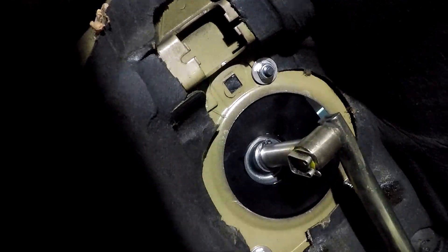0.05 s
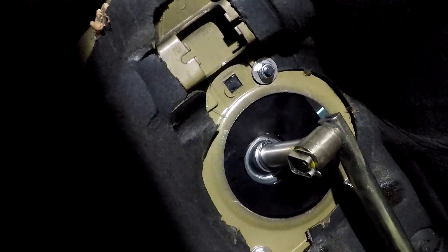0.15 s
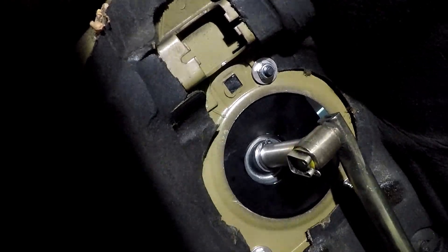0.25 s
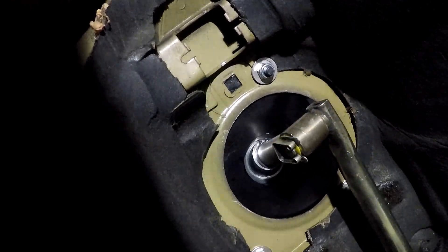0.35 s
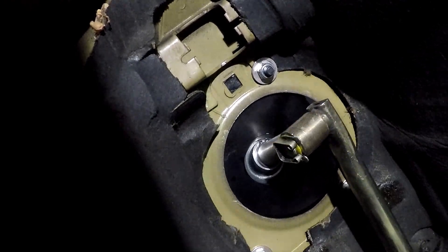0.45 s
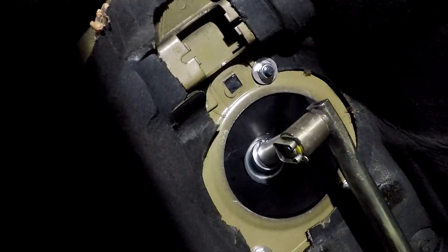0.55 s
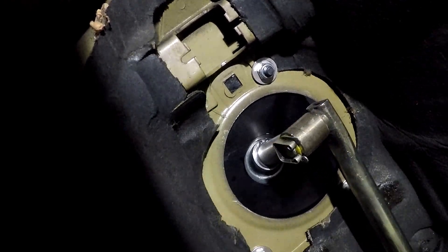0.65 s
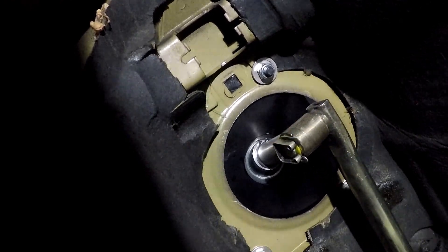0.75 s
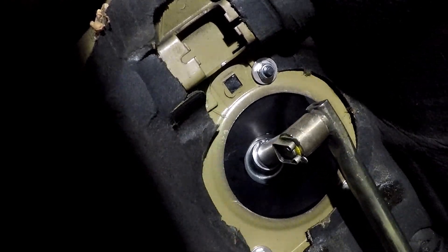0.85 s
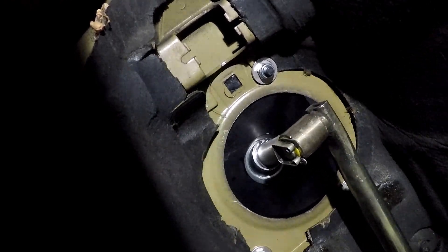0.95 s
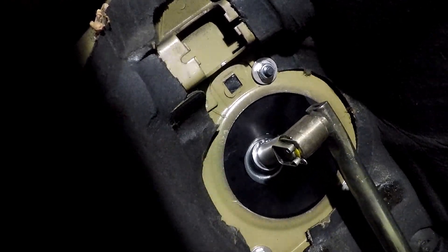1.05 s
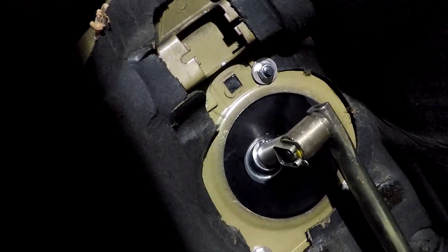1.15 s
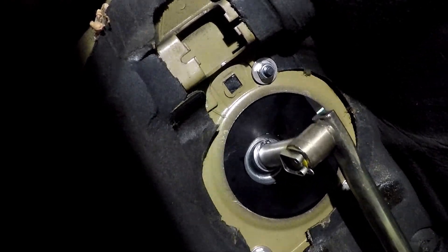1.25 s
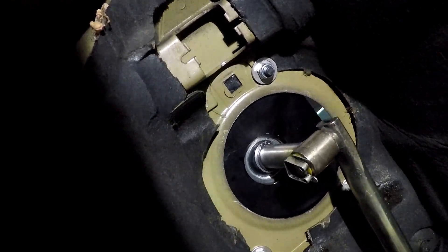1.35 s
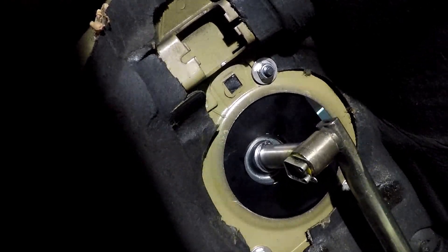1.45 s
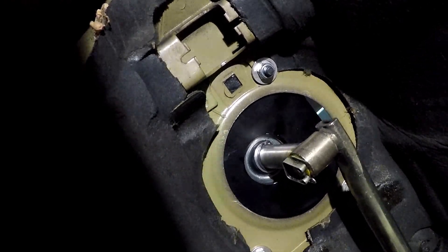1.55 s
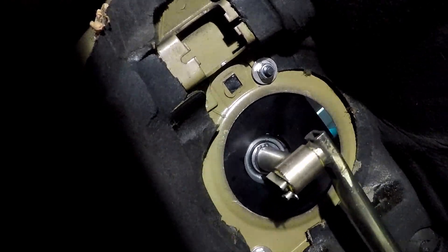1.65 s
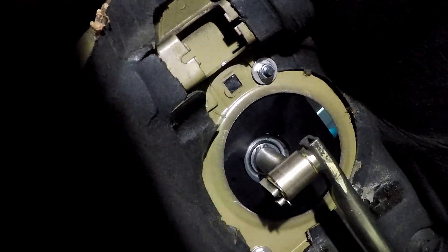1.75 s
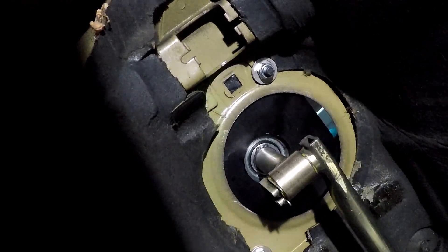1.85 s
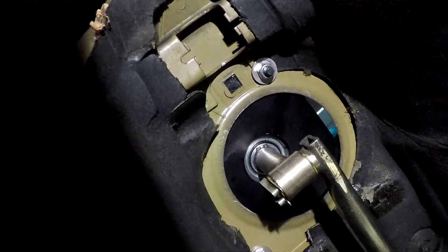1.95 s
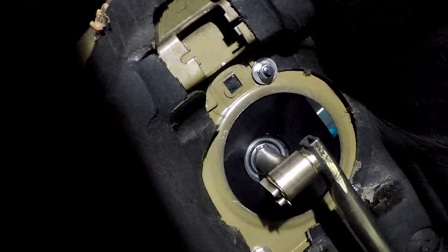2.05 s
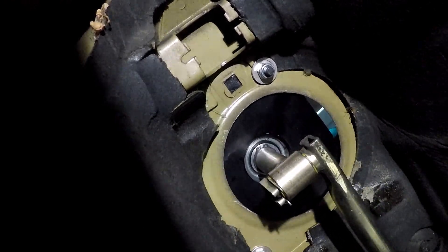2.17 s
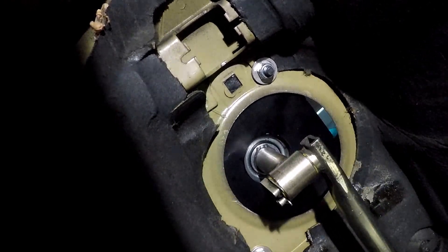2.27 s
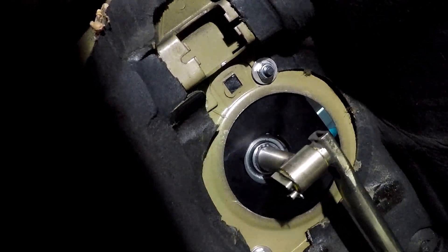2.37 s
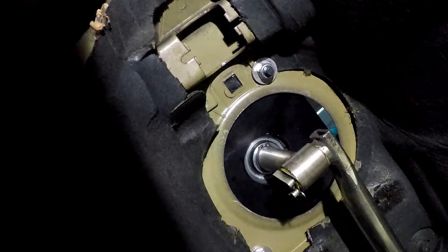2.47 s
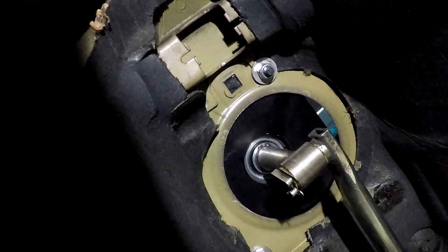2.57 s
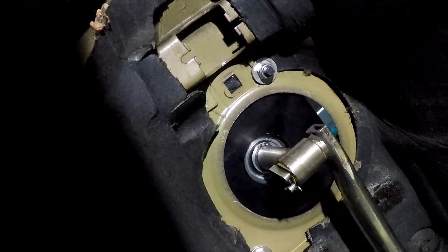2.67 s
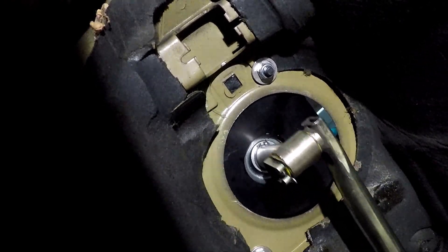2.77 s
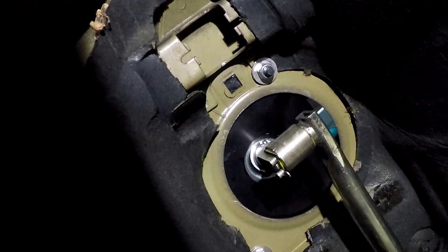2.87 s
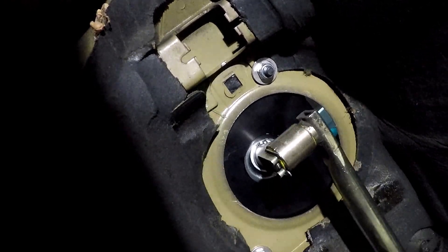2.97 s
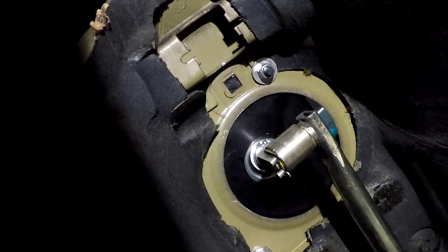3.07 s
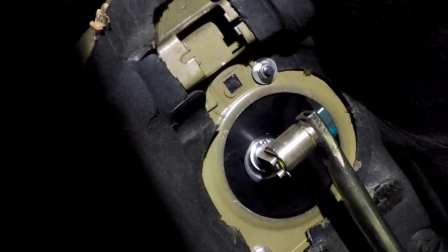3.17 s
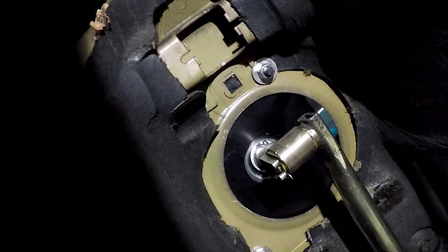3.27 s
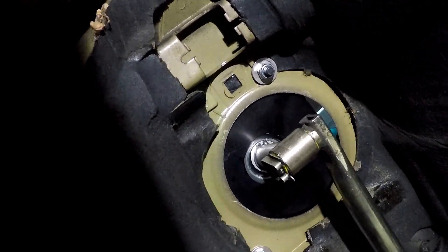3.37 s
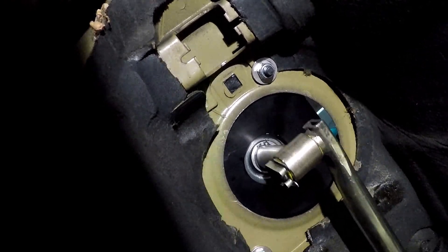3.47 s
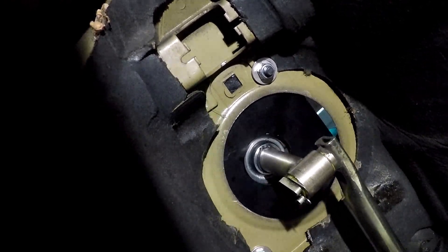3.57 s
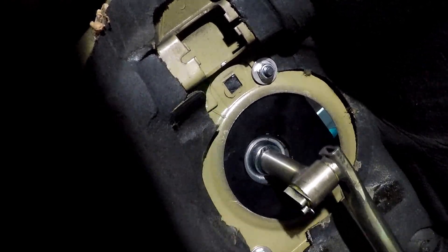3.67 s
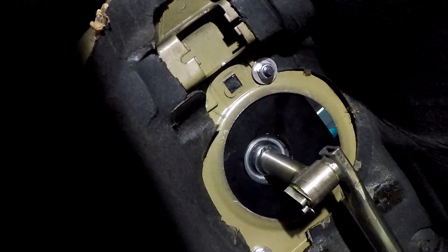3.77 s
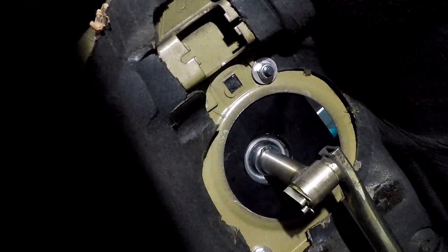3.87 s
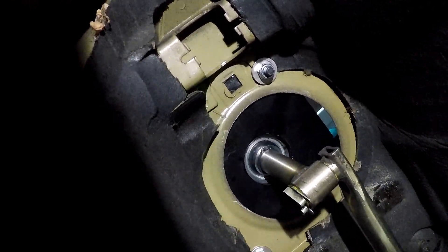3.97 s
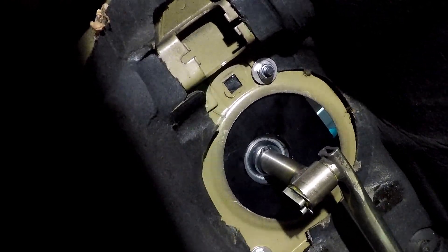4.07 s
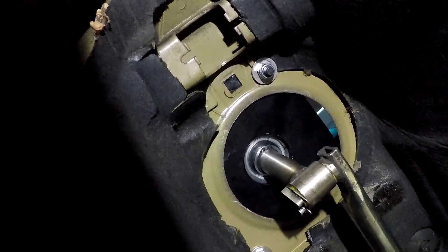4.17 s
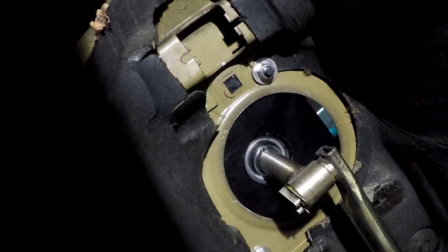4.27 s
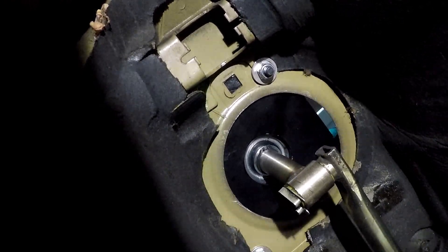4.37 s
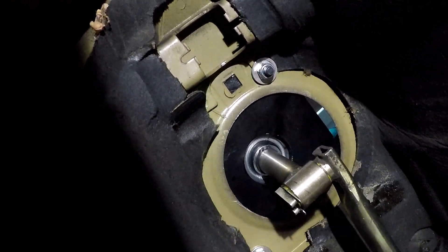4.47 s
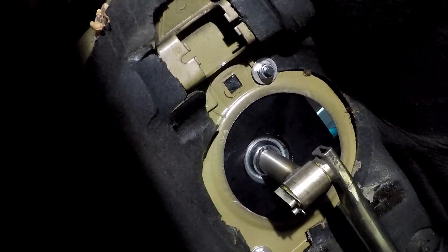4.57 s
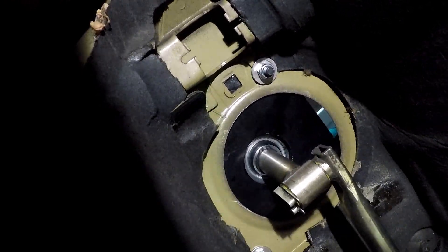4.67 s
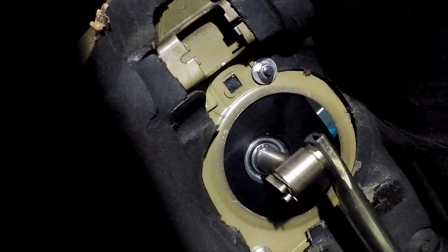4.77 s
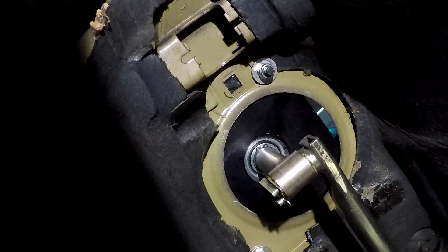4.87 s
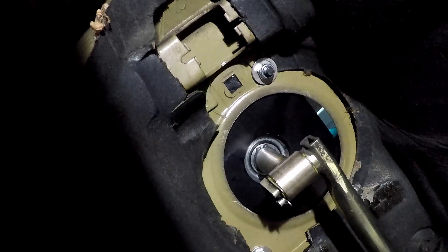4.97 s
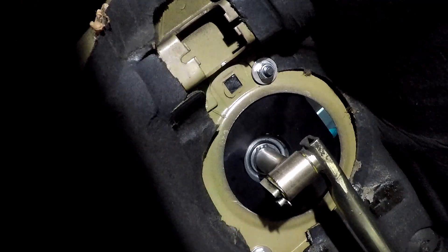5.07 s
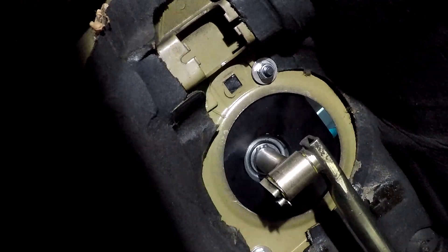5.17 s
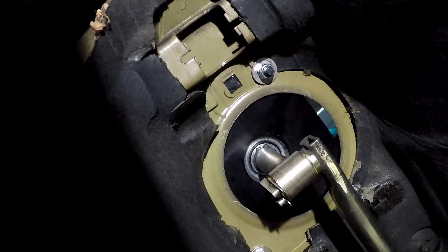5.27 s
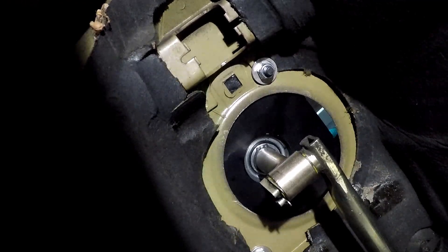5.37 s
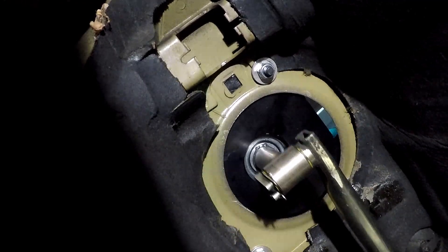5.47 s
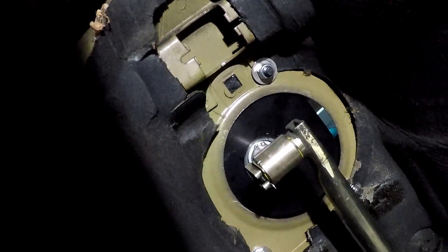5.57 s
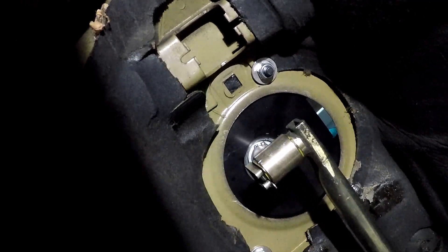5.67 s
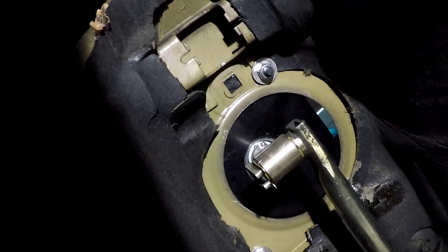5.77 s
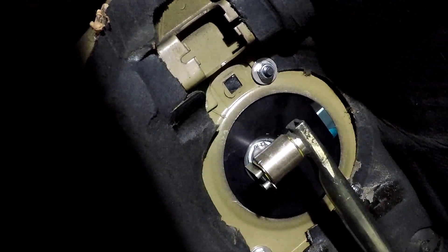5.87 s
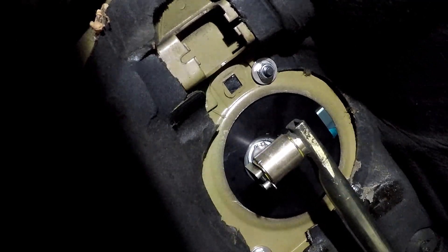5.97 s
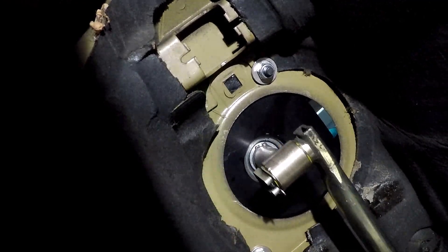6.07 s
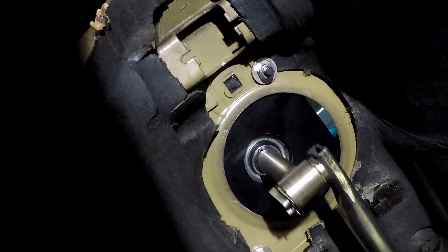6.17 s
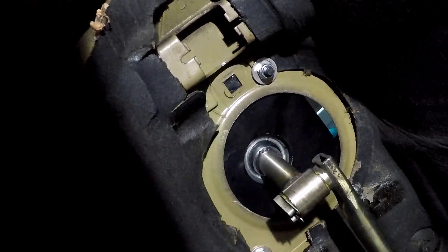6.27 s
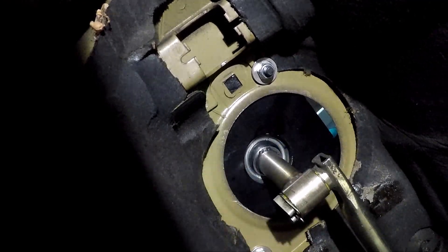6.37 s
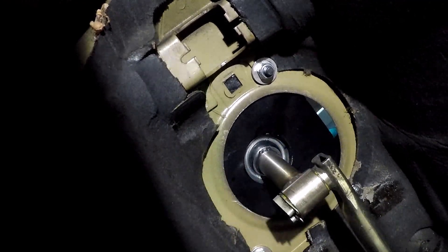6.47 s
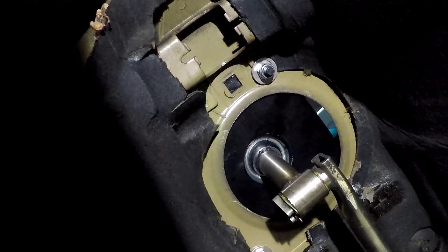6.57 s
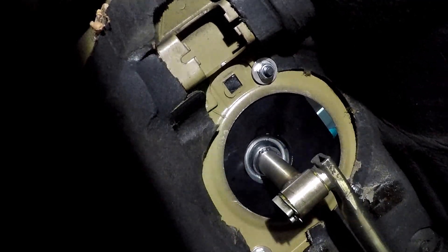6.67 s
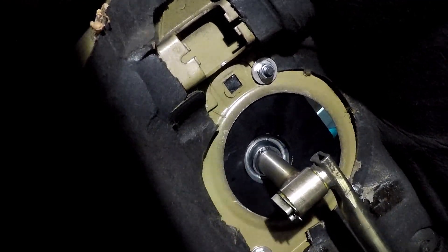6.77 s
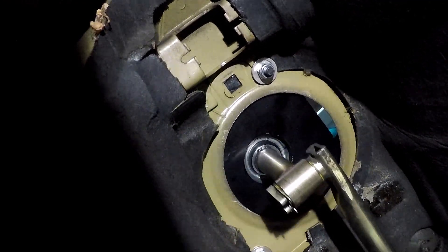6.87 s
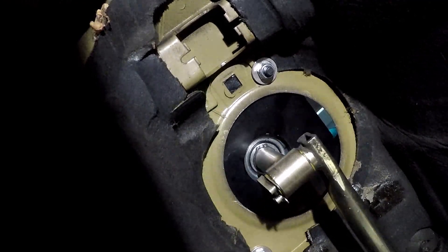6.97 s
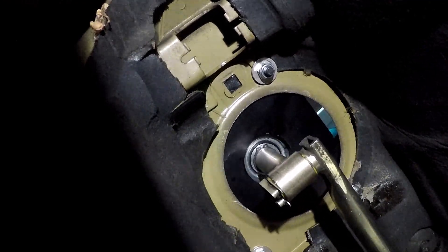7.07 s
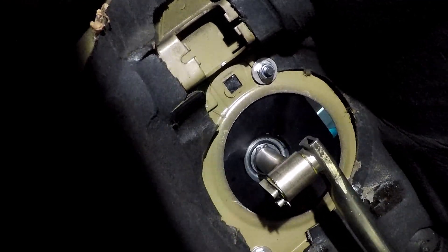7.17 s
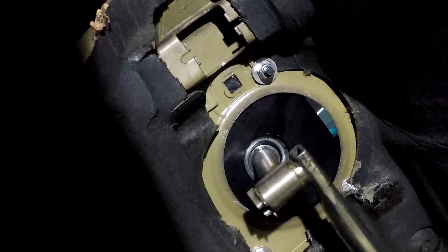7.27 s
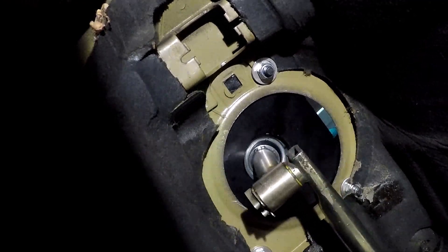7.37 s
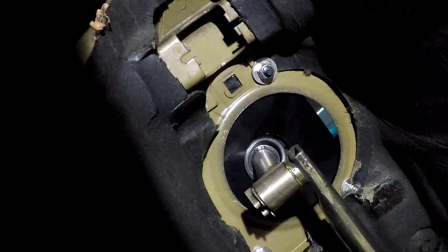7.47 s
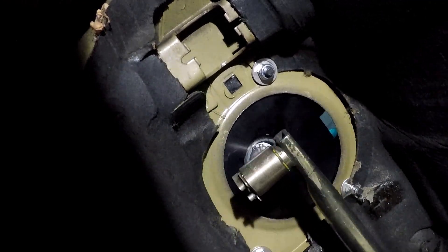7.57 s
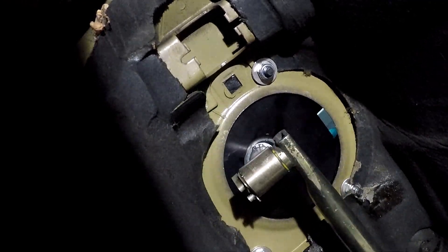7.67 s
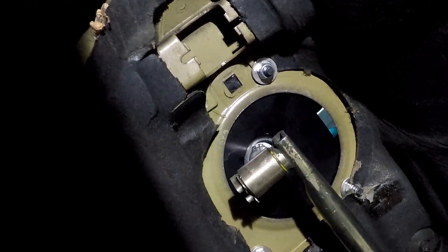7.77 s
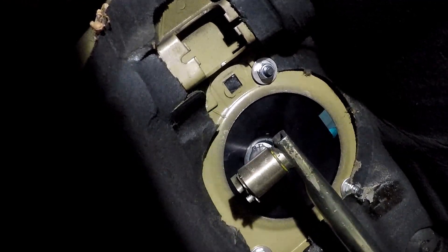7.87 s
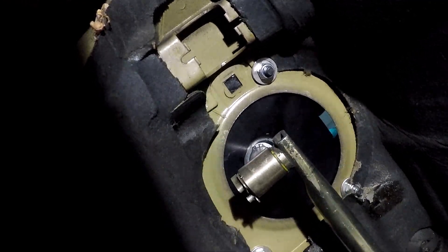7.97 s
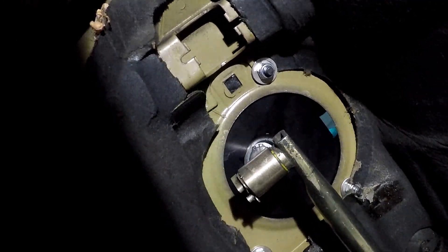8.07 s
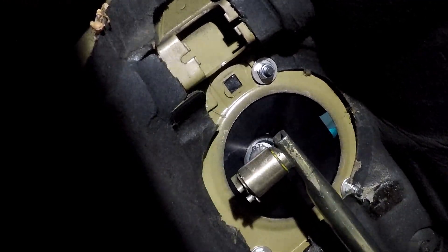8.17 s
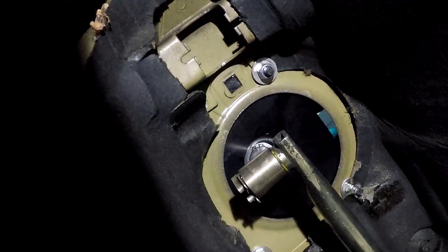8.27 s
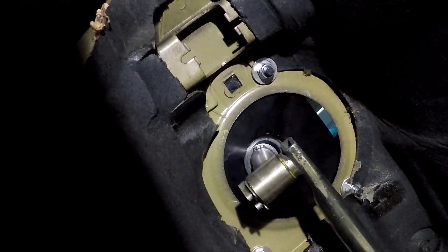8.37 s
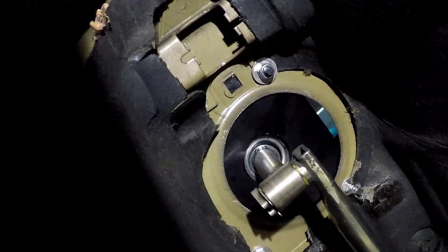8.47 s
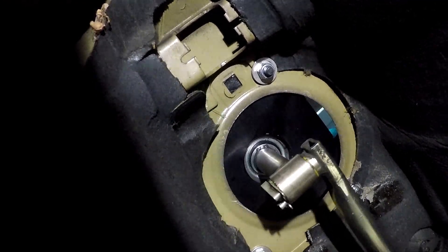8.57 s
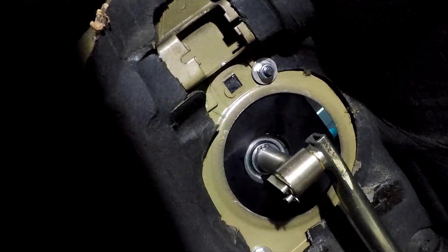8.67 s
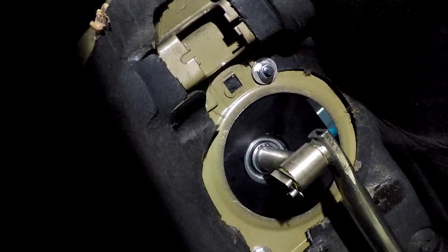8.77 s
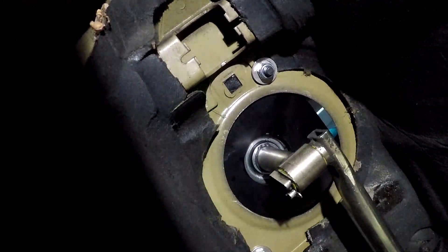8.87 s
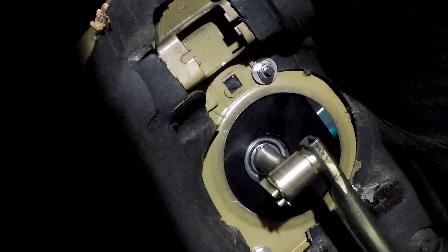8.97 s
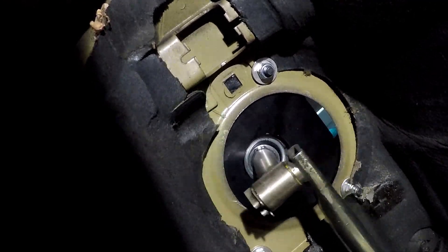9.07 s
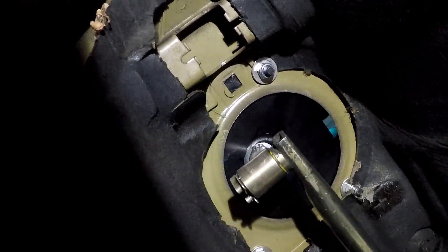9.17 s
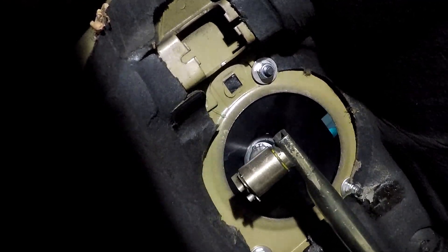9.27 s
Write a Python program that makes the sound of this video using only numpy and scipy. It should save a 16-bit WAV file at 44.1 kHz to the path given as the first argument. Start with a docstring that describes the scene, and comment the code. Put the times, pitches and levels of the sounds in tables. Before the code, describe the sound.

A gear shifter is worked through its gates: steel rod and joint clack, scrape and thud unevenly over faint hum and hiss.

```python
"""A gear lever is worked through the gates, heard close up under a car in a garage over low hum and hiss.
Each contact chatters: lever, rod, bracket, pan and joint, as mode banks plus damped noise, clank and boom.
From the first gates on the joint squeaks, some contacts tick in a narrow band of noise, gears going home
thump the gearbox on its mounts and the joint scrapes in tiny slips; later the rod rings on at end stops.
The gain control ducks on the hardest clunks and creeps back; two clunks, at the start and 2.8 s, spread wide."""
import sys
import numpy as np
from scipy import signal
from scipy.fft import rfft, irfft, next_fast_len
from scipy.io import wavfile
from scipy.ndimage import uniform_filter1d, minimum_filter1d

SR = 44100
rng = np.random.default_rng(int(sys.argv[2]) if len(sys.argv) > 2 else 0)


def digitize_waveform(pressure):
    """Quantize a signal to 16-bit integers and store it at the path in sys.argv[1].

    Rows of a 2-D input are taken as channels; values are limited to [-1, 1].
    """
    field = np.atleast_2d(pressure).T
    bounded = np.clip(field, -1, 1)
    quanta = np.round(bounded * 32767).astype(np.int16)
    wavfile.write(sys.argv[1], SR, quanta)


N = 411453
TIME = np.arange(N) / SR
RING = np.arange(SR // 2) / SR
LEAD_S = 0.02  # grinding ahead of a contact

# dense, quickly damped modes of the floor pan, also heard under the mounts: hz, relative_db
PAN_DENSE = [(40, -14.5), (80, -3.5), (200, -9.5), (320, -20)]


def undb(db):
    """Decibels to gain."""
    return 10 ** (np.asarray(db) / 20)


def unit(x):
    """Scale to rms 1."""
    return x / np.sqrt(np.mean(x ** 2))


def crest(x, size=512):
    """Scale so that the loudest moment has rms 1."""
    power = uniform_filter1d(x ** 2, size, mode="constant")
    return x / np.sqrt(power.max())


def noise(points, size):
    """Noise of rms 1 with a spectrum of (Hz, dB) points, falling steeply outside them."""
    hz, db = np.transpose(points)
    f = np.maximum(np.arange(size // 2 + 1) * SR / size, 1)
    skirts = np.minimum(1, np.minimum(f / hz[0], hz[-1] / f)) ** 2
    colour = undb(np.interp(np.log(f), np.log(hz), db))
    white = rfft(rng.standard_normal(size))
    return unit(irfft(white * skirts * colour, size))


def fade(t, t60):
    """Decay by 60 dB in t60 seconds."""
    return np.exp(-np.log(1000) * t / t60)


def walk(rate):
    """Random drift with a spread near 1, linear between `rate` knots per second."""
    knots = rng.standard_normal(int(N / SR * rate) + 2)
    return np.interp(TIME * rate, np.arange(len(knots)), knots)


def add(track, s, sound):
    """Mix a sound in at a time; what falls outside the track is dropped."""
    i = int(s * SR)
    sound, i = sound[max(-i, 0):len(track) - i], max(i, 0)
    track[i:i + len(sound)] += sound


def tone(hz, t60, rise_s, size):
    """One mode that builds up briefly and dies away."""
    t = np.arange(size) / SR
    sine = np.sqrt(2) * np.sin(2 * np.pi * (hz * t + rng.random()))
    return sine * fade(t, t60) * (1 - np.exp(-t / rise_s))


def impacts(size, per_s, spread_db):
    """Tiny impacts at random moments and of uneven force."""
    hits = rng.random(size) < per_s / SR
    signs = rng.choice([-1, 1], size)
    return hits * signs * undb(spread_db * rng.standard_normal(size))


def background():
    """A restless low hum and a steady hiss, both shaped noise."""
    # hum: hz, relative_db_per_hz
    hum_points = [(20, -10.5), (45, -4), (68, -0.5), (92, -25.5), (125, 6), (150, -6.5), (180, -1.5),
                  (230, -17), (320, -29)]
    # hiss of the garage: hz, relative_db_per_hz
    air_points = [(250, 4.5), (350, -1.5), (388, 12), (440, -6.5), (660, 1.5), (900, -8), (1400, -8.5),
                  (2000, -14.5), (2400, -14), (3600, -22), (6500, -26), (7700, -21), (10200, -27.5),
                  (15000, -40)]
    hum = noise(hum_points, N) * undb(-43.5 + 1.0 * walk(5.5))
    hiss = noise(air_points, N) * undb(-58.5 + 0.12 * walk(4.5))
    return hum + hiss


def steel_part(modes, dense, dense_t60, dense_db, scatter_db, detune=0.009):
    """A part's impulse response; each call meets it at another point and load, so the modes mix and shift."""
    hz, db, t60 = np.transpose(modes)[:, :, None]
    # cut off after 0.15 to 0.5 s
    t = RING[:next_fast_len(int(np.clip(t60.max(), 0.15, 0.5) * SR))]
    rings = undb(db) * fade(t, t60)
    damping = fade(t, dense_t60)
    # a part needs a cycle or so to start moving
    onset = (1 - np.exp(-2 * hz.mean() * t)) ** 3

    def response():
        """One fresh blow: separate modes over dense clatter."""
        mix, shift = rng.standard_normal((2, len(modes), 1))
        cycles = hz * (1 + detune * shift) * t + rng.random((len(modes), 1))
        sines = np.sin(np.float32(2 * np.pi * cycles))
        ringing = np.sum(undb(scatter_db * mix) * rings * sines, axis=0)
        clatter = noise(dense, len(t)) * damping
        return onset * (crest(ringing) + undb(dense_db) * crest(clatter))
    return response


def floor_pan():
    """Sheet steel with few low modes: the thud."""
    # hz, relative_db, t60_s
    modes = [(124.14, -9.5, 0.35), (147.2, -4, 0.27), (202.8, 5, 0.095), (226.7, -5, 0.18)]
    return steel_part(modes, PAN_DENSE, dense_t60=0.17, dense_db=-4.5, scatter_db=3.0)


def gearbox_bracket():
    """Heavy steel with low-mid modes: the clunk."""
    # hz, relative_db, t60_s
    modes = [(281.2, -4, 0.19), (347, 4, 0.22), (389, 0.5, 0.095), (448.8, -1, 0.099)]
    # hz, relative_db
    dense = [(170, -38), (260, 2.5), (470, -5), (650, -31)]
    return steel_part(modes, dense, dense_t60=0.13, dense_db=-1.0, scatter_db=5.5)


def shift_rod():
    """A rod with close modes in the middle: the clank."""
    # hz, relative_db, t60_s
    modes = [(533, -2.5, 0.078), (603.6, 1, 0.11), (682, -2.5, 0.16), (782, -5.5, 0.097), (873, -12, 0.028)]
    # hz, relative_db
    dense = [(360, -30.5), (510, 5), (900, -4), (1300, -29)]
    return steel_part(modes, dense, dense_t60=0.1, dense_db=-0.5, scatter_db=5.5)


def gear_lever():
    """A light lever with modes from 1 kHz up: the clink."""
    # hz, relative_db, t60_s
    modes = [(991, -4, 0.065), (1120.6, -1, 0.14), (1206, 10.5, 0.04), (1363, 0.5, 0.082),
             (1576, -23, 0.058), (1610, -27, 0.09), (1835, -13.5, 0.065), (2352, 3, 0.021),
             (2480, -12, 0.04)]
    # hz, relative_db
    dense = [(700, -13.5), (1050, -1.5), (1400, 0), (1900, -5.5), (2700, -19.5), (3500, -24.5), (7000, -53)]
    return steel_part(modes, dense, dense_t60=0.063, dense_db=0.5, scatter_db=-1.0)


def steel_joint():
    """Small hard faces with high modes under strong dense clatter: the click."""
    # hz, relative_db, t60_s
    modes = [(2630, -6, 0.04), (3630, 4.5, 0.057), (3750, -7.5, 0.05), (4030, -5, 0.046), (4550, -6, 0.05),
             (4900, -3, 0.048), (5070, -6, .045), (5400, -4, 0.044), (6880, 7, 0.027)]
    # hz, relative_db
    dense = [(1800, -0.5), (2700, 5), (3300, -4), (3900, 2), (5000, 3), (6800, -4), (8000, -8.5),
             (10500, -16.5), (15000, -36)]
    return steel_part(modes, dense, dense_t60=0.086, dense_db=10.0, scatter_db=1.0, detune=0.014)


def strike(part, rise_s, bounce, grind):
    """The faces grind together, hit and chatter; heavy parts take longer to get going."""
    approach_s, chatter_s = 0.018, 0.0035
    t = RING[:SR // 12] - LEAD_S
    before = grind * np.exp(np.minimum(t, 0) / approach_s)
    after = bounce * np.exp(-np.abs(t) / chatter_s)
    force = np.where(t < 0, before, after) * impacts(len(t), per_s=2000, spread_db=2.5)
    force[int(LEAD_S * SR)] = 1  # the contact itself
    sound = signal.fftconvolve(force, part())[:len(RING)]
    rise = np.tanh((RING[:len(sound)] - LEAD_S) / rise_s - 0.5)
    return crest(sound * (1 + rise + grind))


def knocks(pan, bracket, rod, lever, joint):
    """Each contact clanks with its own note; hardness adds the joint's click, heft the pan's thud."""
    # linkage contacts; hardness: bare steel against cushioned, heft: mass behind the blow,
    # balance: from heavy bracket to light lever, note: resonance of that lever position:
    # start_s, force_db, hardness_db, heft_db, balance_db, note_hz, note_db (all but force relative)
    contacts = [(0.002, -47, 10.5, 10, -6, 483, 9.5), (0.284, -46.5, 2, 5, 3, 1290, -3),
                (0.306, -31.5, -5, 4.5, -5.5, 500, 3), (0.322, -29, 4.5, 7.5, -5, 282, 13),
                (0.341, -26, -4, 5.5, -5, 806, 1.5), (1.197, -51.5, 7, 15, -1, 371.2, 10),
                (1.281, -42.0, 16, 1.5, 1.5, 1920, -1), (1.312, -28.5, 12.5, 1.5, 2.5, 2220, -4.5),
                (1.324, -27.5, 5, -0.5, -1.5, 266, 9), (1.6, -39, 6, 3, 5, 1371, 6),
                (1.61, -30.5, -15, -10, 1, 585, 7), (1.633, -42, -1, 9, 2.5, 282, 10),
                (1.674, -46.5, 5, 0, 4, 458, 10), (1.718, -47.5, -1.5, 7.5, 0.5, 392, 7.5),
                (2.287, -51.5, -3, 15, -0.5, 363, 3), (2.343, -41.5, 1, 2, 0, 1360, -2),
                (2.397, -42, 5.5, -10, 2, 788, 4.5), (2.599, -56.5, 0, 14.5, 1, 1144, -1),
                (2.661, -46, -4, 7.5, -1.5, 398, 8), (2.675, -42.5, -29, 5, -9, 330, 14),
                (2.779, -27.5, -5.5, 0.5, -0.5, 1130, 1), (2.799, -34, 4.5, 2.5, -2, 571, 13),
                (2.811, -26, 2, 4, 1.5, 1415, -6), (3.276, -50.5, 9, 9, 6.5, 1394, 5),
                (3.517, -30, 8.5, 1.5, 1.5, 1430, 2), (3.529, -30.5, 7.5, 6, 3, 1173, 3),
                (3.584, -35, 14.5, 0.5, 6, 343, 10), (3.642, -44.5, 0, 8.5, -1, 328, 16),
                (3.677, -41.5, -6, 3.5, 5.5, 1175, 5), (3.69, -32, 9, 3.5, 1.5, 372, 12),
                (4.156, -37.5, -11, 9, -2.5, 874, 1), (4.232, -48.5, -1, 5.5, -1, 1247, 1),
                (4.761, -46.5, 2, 13, 3, 1113, 5), (4.782, -28.0, 7.5, -4, 3, 1207, 0),
                (4.798, -33.0, 9, 4.5, 3, 1374, -5), (4.812, -41, 17, 0, 3, 459, 10),
                (4.847, -38, 9.5, -12, -1, 345, 5), (5.464, -35, -3, 7.5, 0, 482, 3),
                (5.484, -26.5, -8, -2, -1.5, 587, -3), (5.5, -25, 4, 2.5, 2.5, 790, 2.5),
                (5.523, -27.5, -1, 5, 2, 1422, 4), (5.532, -20, 8, -2, 5, 640, 1),
                (6.024, -49, -30, 18.5, -7, 656, 9), (6.044, -38.5, 13, 11.5, 0.5, 459, 7.5),
                (6.138, -28.5, 11, 3, 2.5, 1117, 0), (6.151, -22, 3, 2.5, -5, 500, -3),
                (6.163, -31.5, -7, 3.5, -3, 360, 3.5), (6.197, -22.5, -1, -17, 0.5, 392, 4.5),
                (6.216, -33, 1, 0.5, 0, 394, 6), (6.227, -23, 5.5, -7.5, 0.5, 671, 5),
                (6.708, -32.5, -12, 4.5, -5.5, 668, 3), (6.753, -52.0, 13.5, 15, 7, 465, 7),
                (6.917, -27, 8.5, 0, 2, 642, 0.5), (6.926, -35, 3, 6, 1, 290, 5),
                (7.014, -49.5, 7, 9, 0, 570, 10.5), (7.093, -60, 12, 15.5, 6.5, 342, 15),
                (7.246, -51, 4, 9, -8, 380, 12), (7.299, -38, 2, -2.5, -2.5, 556, 7),
                (7.326, -47, 8.5, 14.5, 3, 344, 8), (7.353, -28.5, -11, -0.5, 2, 842, 5.5),
                (7.526, -39.5, 8.5, 7, 2, 1170, -9), (7.549, -39, 6, 0.5, -3, 1400, 2),
                (7.561, -23.5, 5.5, -8, 4, 1015, -1), (7.577, -21, 4.5, -1, 4, 403, -5),
                (8.294, -28.5, -16, 2, -3, 815, 2), (8.339, -42.5, 9.5, 7, 2.5, 353, -8),
                (8.475, -38.5, 20, -0.5, 6, 1185, 6.5), (8.484, -36.5, 17, 0, 2.5, 499, 6.5),
                (8.56, -41, 4, 0, 0, 1158, 0), (8.655, -45, -1, -3, 3, 560, 10.5),
                (8.963, -56, 9, 9.5, 2, 580, 8), (8.992, -41.5, -6, -5, 0, 414, 3),
                (9.032, -47.5, 1, -1, 2, 443, 6), (9.085, -33.5, 6, 5, -0.5, 358, 3),
                (9.114, -42.5, 10, 10, 3, 348, 15), (9.164, -31.5, 12, 1.5, 2, 1565, 7),
                (9.176, -25, 8, -2.5, 5.5, 403, -3.5)]
    out = np.zeros(N + SR)
    for s, force_db, hardness_db, heft_db, balance_db, note_hz, note_db in contacts:
        note = tone(note_hz, t60=0.079, rise_s=0.0027, size=SR // 4)
        add(out, s, undb(force_db + note_db + 0.5) * note)
        thud = undb(heft_db + 5) * strike(pan, rise_s=0.0092, bounce=0.36, grind=0.079)
        clunk = undb(-balance_db) * strike(bracket, rise_s=0.0092, bounce=0.88, grind=0.43)
        clank = undb(-1.07) * strike(rod, rise_s=0.0065, bounce=0.96, grind=0.53)
        clink = undb(balance_db - 5) * strike(lever, rise_s=0.0032, bounce=0.42, grind=0.45)
        click = undb(hardness_db - 19.5) * strike(joint, rise_s=0.0011, bounce=0.5, grind=0.51)
        for sound in (thud, clunk, clank, clink, click):
            add(out, s - LEAD_S, undb(force_db) * sound)
    return out[:N]


def room(x, colour, t60, build_s):
    """Dense echoes that build up and die away; gain 1 in their strongest band."""
    t = np.arange(2 * SR) / SR
    echoes = noise(colour, len(t)) * fade(t, t60) * (1 - np.exp(-t / build_s))
    power = uniform_filter1d(np.abs(rfft(echoes)) ** 2, size=200)
    return signal.fftconvolve(x, echoes / np.sqrt(power.max()))[:N]


def floor_panels(linkage):
    """The floor panels murmur on diffusely."""
    # hz, relative_db
    colour = [(280, -10.5), (480, -2), (640, 0.5), (900, -8), (1300, -3.5), (1700, -4), (2400, -20)]
    return undb(-20.5) * room(linkage, colour, t60=0.62, build_s=0.013)


def underbody_boom(linkage):
    """The space under the car booms on."""
    # hz, relative_db
    colour = [(30, -27), (50, 1), (67, 2), (95, -2.5), (130, -10.5), (190, -10), (260, -35.5)]
    return undb(1.5) * room(linkage, colour, t60=0.98, build_s=0.03)


def underbody_sheets(linkage):
    """The underbody's steel sheets ring on diffusely."""
    # hz, relative_db
    colour = [(1100, -14), (1620, 2), (2000, -14), (3300, -15), (4300, 0), (4750, 0.5), (5400, -14),
              (6500, -16)]
    return undb(-13.5) * room(linkage, colour, t60=0.33, build_s=0.0099)


def garage_echo(linkage):
    """The garage answers with short, bright echoes."""
    # hz, relative_db
    colour = [(200, -16), (400, 6), (650, 1), (1400, -1), (3000, 3.5), (5000, 1.5), (7500, 3.5),
              (10000, 10), (12000, -7), (15000, -16)]
    return undb(-8.5) * room(linkage, colour, t60=0.34, build_s=0.012)


def airy_shimmer(linkage):
    """A thin, high shimmer builds slowly and lingers."""
    # hz, relative_db
    colour = [(5000, -48), (7000, -15), (8300, -3.5), (9500, -1), (10500, 0.5), (11500, -15), (14000, -32)]
    return undb(-6) * room(linkage, colour, t60=1.0, build_s=0.058)


def squeaks():
    """The dry joint's slips lock to one mode for a moment and give a short, rough tone."""
    # start_s, length_s, pitch_hz, level_db
    locked_slips = [(0.285, 0.058, 1300, -41.5), (5.518, 0.022, 4830, -34), (6.883, 0.089, 1512, -42),
                    (7.338, 0.059, 2240, -46), (8.05, 0.07, 1360, -63), (9.139, 0.06, 1640, -31),
                    (9.162, 0.031, 4940, -39)]
    out = np.zeros(N)
    waver = 1 + 0.048 * walk(700)
    for start, length_s, hz, db in locked_slips:
        swell = np.hanning(int(length_s * SR))
        pitch_hz = hz * waver[int(start * SR):][:len(swell)]
        phase = 2 * np.pi * np.cumsum(pitch_hz) / SR
        add(out, start, undb(db) * crest(swell * np.sin(phase)))
    return out


def ticks():
    """Some contacts also give a short, dry tick: decaying noise in a narrow band."""
    # start_s, level_db, centre_hz
    tick_bands = [(0.306, -45, 2560), (0.323, -42, 2500), (1.196, -72, 5440), (1.314, -34, 2120),
                  (1.596, -52, 6000), (1.632, -57, 5030), (1.672, -60, 5000), (2.285, -59, 2100),
                  (2.344, -60.5, 5650), (2.398, -56, 2400), (3.276, -60.5, 5515), (3.585, -38, 3370),
                  (4.233, -50, 1290), (4.782, -39, 2400), (4.848, -33, 1160), (4.848, -44, 2530),
                  (5.501, -34, 2090), (7.301, -44, 1180), (7.326, -48, 1200), (6.146, -32.5, 1850),
                  (6.227, -44, 5070), (7.574, -34, 4850), (8.295, -45, 1860), (8.338, -56, 5300),
                  (8.48, -36, 1982), (8.56, -69, 5400), (8.654, -57.5, 5100), (9.173, -46, 5320)]
    t60_s, rise_s, skirt_db = 0.043, 0.0013, -29
    fifth = 1.5  # frequency ratio from centre to skirts
    out = np.zeros(N)
    t = RING[:SR // 10]
    envelope = fade(t, t60_s) * (1 - np.exp(-t / rise_s))
    for s, db, hz in tick_bands:
        band = [(hz / fifth, skirt_db), (hz, 0), (hz * fifth, skirt_db)]
        add(out, s, undb(db) * crest(noise(band, len(t)) * envelope))
    return out


def rocks():
    """A gear goes home: the gearbox sways on its mounts with a thump and the air under the car rings."""
    # start_s, thump_db, lower_standing_wave_db, upper_standing_wave_db
    thumps = [(0.335, -22, -52, -14), (1.328, -40, -45, -46), (2.813, -34, -37, -16.5),
              (3.689, -30, -29, -25.5), (4.802, -30, -43, -44), (5.518, -22.5, -19.5, -18),
              (6.198, -22.5, -35, -37), (6.919, -29, -36, -32), (7.561, -18.5, -17, -16.5),
              (8.491, -26, -42, -33), (9.17, -24, -21.5, -21)]
    # gearbox on its mounts: hz, relative_db, t60_s
    mount_modes = [(52.6, -1, 0.86), (67, 2, 1), (84.7, 2, 0.65)]
    # standing waves between floor and underbody: hz, t60_s
    cavity = [(124.7, 0.98), (150.3, 0.67)]
    out = np.zeros(N)
    mounts = steel_part(mount_modes, PAN_DENSE, dense_t60=0.23, dense_db=-27, scatter_db=-4.0)
    for s, thump_db, *waves_db in thumps:
        add(out, s, undb(thump_db) * crest(mounts()))
        for (hz, t60), db in zip(cavity, waves_db):
            add(out, s, undb(db) * tone(hz, t60, rise_s=0.018, size=SR))
    return out


def slides(rod, lever, joint):
    """Dry steel rubs in tiny slips that swell and die with the stroke; hard faces hiss in the joint."""
    # joint slides under load: start_s, end_s, force_db, hardness_db (relative)
    strokes = [(1.246, 1.318, -44, 3), (2.617, 2.833, -48, -8), (3.476, 3.53, -45, -3),
               (4.722, 4.826, -46, 4), (6.059, 6.177, -43, -10), (6.845, 6.913, -47.5, 8.5),
               (7.195, 7.36, -44.5, -10), (7.374, 7.511, -58.5, 23.5), (8.414, 8.482, -46, 4),
               (8.563, 8.63, -45, -2), (8.993, 9.085, -45.5, -5)]
    out = np.zeros(N)
    for start, end, force_db, hardness_db in strokes:
        size = int((end - start) * SR)
        swell = np.sin(np.linspace(0, np.pi, size))
        slips = impacts(SR // 2, per_s=380, spread_db=4)[:size] * swell
        # hardness drives lever and joint more, against the rod
        shares_db = 0, -8.5 + 0.26 * hardness_db, -25 + hardness_db
        for part, db in zip((rod, lever, joint), shares_db):
            scrape = signal.fftconvolve(slips, part())
            add(out, start, undb(force_db + db) * crest(scrape))
    return out


def stops():
    """Against an end stop, under load, the rod holds a few close notes and the joint a thin, high ring."""
    # start_s, rod_db, joint_db
    end_stops = [(3.529, -27.5, -50), (5.535, -23, -48), (6.227, -39, -57), (6.926, -41, -64),
                 (7.577, -24, -50), (8.294, -34, -72), (8.484, -60, -58), (9.177, -24, -56)]
    # rod modes that ring on: hz, relative_db, t60_s
    rod_modes = [(518, -11, 0.18), (622, -4, 0.15), (670, -1, 0.21), (799, -12, 0.089)]
    # close joint modes that ring on: hz, relative_db
    joint_band = [(4100, -16), (4450, -3), (4700, -3), (5000, -8), (5400, -19)]
    out = np.zeros(N)
    for s, rod_db, joint_db in end_stops:
        for hz, db, t60 in rod_modes:
            add(out, s, undb(rod_db + db) * tone(hz, t60, rise_s=0.006, size=len(RING)))
        thin_ring = noise(joint_band, len(RING)) * fade(RING, t60=0.34)
        add(out, s, undb(joint_db) * crest(thin_ring))
    return out


def width():
    """Side gain: the sound opens quickly, holds and slowly narrows to mono."""
    # two clunks spread wide: start_s, hold_s, side_db
    spreads = [(0, 0.37, 0.5), (2.796, 0.027, -9)]
    widen_db_per_s, narrow_db_per_s = 234, 41.5
    gain = np.zeros(N)
    for start, hold_s, db in spreads:
        opening_db = widen_db_per_s * np.maximum(start - TIME, 0)
        closing_db = narrow_db_per_s * np.maximum(TIME - start - hold_s, 0)
        gain += undb(db - opening_db - closing_db)
    return gain


def between_ears(x):
    """Mono, except for two spells in which the ears fall out of step and the deep bass thins."""
    # side against mid while wide: hz, relative_db
    scatter = [(60, -2), (200, -2.5), (380, 9.5), (700, 9.5), (1300, 6.5), (2500, 1), (4400, -5.5),
               (15000, -1)]
    thin_hz, thin_share = 78.6, 0.19
    side_lag_rad = 1.48  # about a quarter cycle
    wide = width()
    deep = signal.sosfiltfilt(signal.butter(2, thin_hz, fs=SR, output="sos"), x)
    mid = x - thin_share * wide / (wide + 0.15) * deep
    size = next_fast_len(N + SR)
    hz, db = np.transpose(scatter)
    f = np.arange(size // 2 + 1) * SR / size
    colour = undb(np.interp(np.log1p(f), np.log(hz), db))
    lagged = rfft(mid, size) * colour * np.exp(-1j * side_lag_rad)
    side = wide * irfft(lagged, size)[:N]
    return np.array([mid + side, mid - side])


def gain_control(x):
    """The gain drops at once to hold a peak at the ceiling, then recovers at a steady rate."""
    ceiling_db, recovery_db_per_s, start_cut_db = -12.5, 8.5, 5.5
    peak = np.abs(x).max(axis=0)
    over_db = 20 * np.log10(np.maximum(peak / undb(ceiling_db), 1))
    recovered_db = recovery_db_per_s * TIME
    held_db = np.maximum.accumulate(np.maximum(over_db + recovered_db, start_cut_db))
    cut_db = held_db - recovered_db
    # widen each dip, then smooth its edges
    gain_db = uniform_filter1d(minimum_filter1d(-cut_db, size=128), size=128)
    return x * undb(gain_db)


def scene():
    """The linkage in its garage; nearly mono, spreading wide on two of the clunks."""
    pan, bracket, rod = floor_pan(), gearbox_bracket(), shift_rod()
    lever, joint = gear_lever(), steel_joint()
    linkage = knocks(pan, bracket, rod, lever, joint) + squeaks() + ticks() + slides(rod, lever, joint)
    under_car = underbody_boom(linkage) + floor_panels(linkage) + underbody_sheets(linkage)
    around = garage_echo(linkage) + airy_shimmer(linkage)
    return between_ears(background() + linkage + rocks() + stops() + under_car + around)


def record(dry):
    """The recorder rides its gain and cuts the top."""
    top_hz = 15000
    low_pass = signal.ellip(8, 0.2, 80, top_hz, fs=SR, output="sos")
    return signal.sosfilt(low_pass, gain_control(dry))


dry = scene()
out = record(dry)
digitize_waveform(out)
```